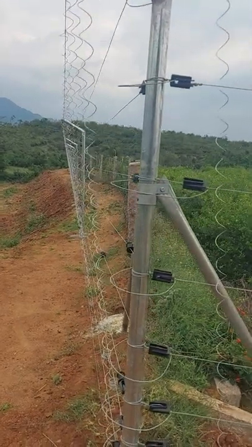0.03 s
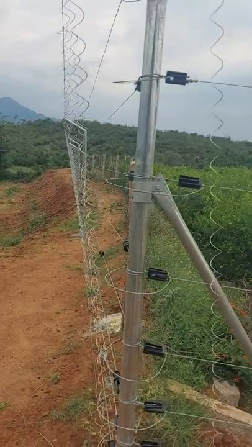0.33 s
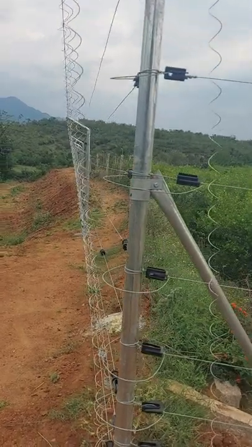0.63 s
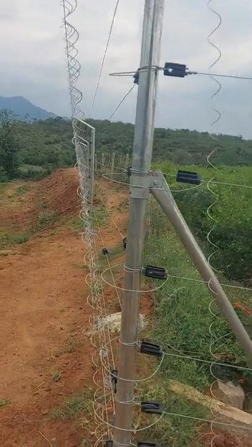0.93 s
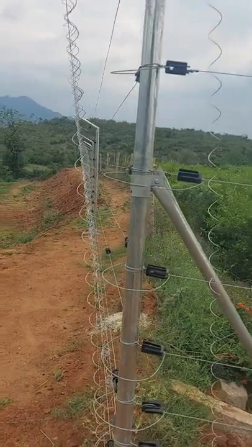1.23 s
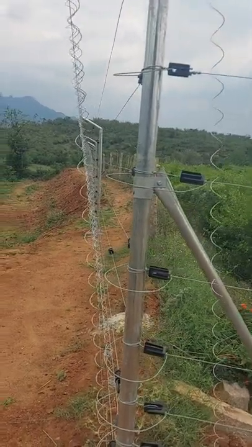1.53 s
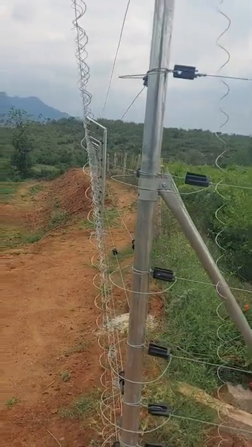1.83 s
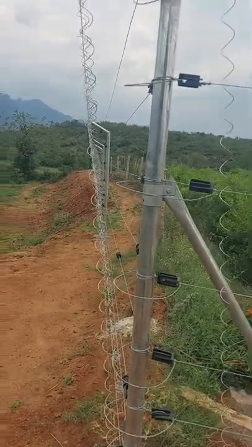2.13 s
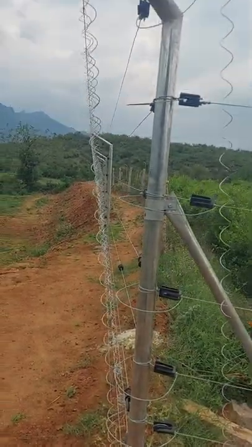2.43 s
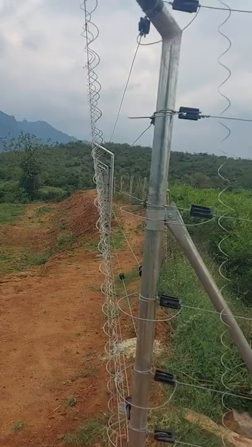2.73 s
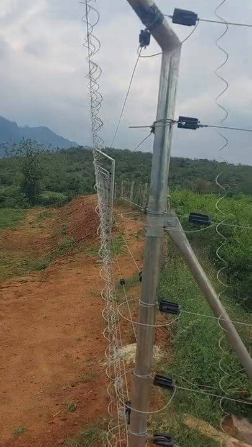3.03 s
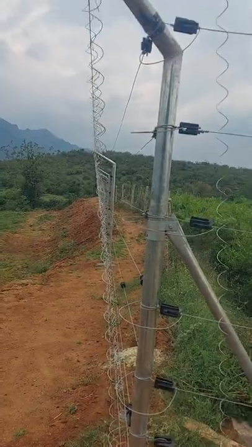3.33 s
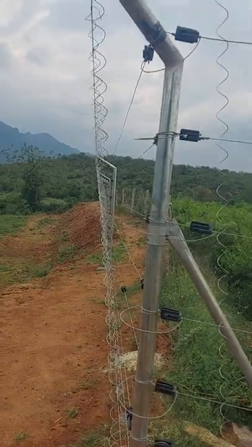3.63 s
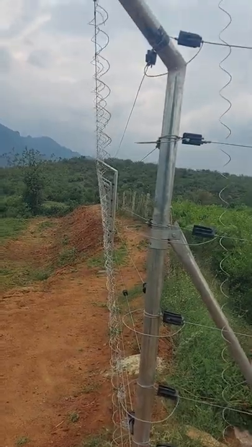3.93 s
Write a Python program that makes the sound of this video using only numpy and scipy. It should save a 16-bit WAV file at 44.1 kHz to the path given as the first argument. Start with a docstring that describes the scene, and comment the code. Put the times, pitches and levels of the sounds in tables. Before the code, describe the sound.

Metal fence wires scrape briefly, then from 0.5 seconds the fittings knock on a steel post in sharp, irregular ringing clinks, slightly to the right. They come in clusters until 1.2 seconds, from 1.7 to 2.2, and from 2.7 to 3.3, with small rustles and ticks between. A very faint bird whistles around 1 second. Low wind rumbles on the microphone, gusting around 3 seconds.

```python
"""Open country, where the wires and fittings of a metal fence knock on a steel post, a little to the right.
Each clink is a short chattering contact that sets the post, the fittings and a shimmer of wire modes
ringing; between clinks the wires slide and rustle, and a few dry ticks sound. Wind rumbles on the
microphone, mostly on the right, and a faint bird whistles far off in a soft wash of air."""
import sys
import numpy as np
from scipy import signal
from scipy.fft import rfft, irfft
from scipy.io import wavfile
from scipy.ndimage import uniform_filter1d

SR = 44100
rng = np.random.default_rng(int(sys.argv[2]) if len(sys.argv) > 2 else 0)


def wrap_up_sound(samples):
    """Save the sound to the file named by the first command line argument, as 16-bit audio."""
    columns = np.atleast_2d(samples).T
    # keep every value between -1 and 1, then stretch to whole-number steps
    tamed = np.clip(columns, -1, 1)
    steps = np.round(tamed * 32767).astype(np.int16)
    wavfile.write(sys.argv[1], SR, steps)


N = 176400

# ringing modes of the fittings: pitch_hz, level_db
FITTING_MODES = [(672, -7), (1383, -6), (1819, -4), (2505, 1), (2616, -3), (2897, -5), (3090, -21.5),
                 (3396, -11.5), (3660, -7.5), (3784, -7.5), (4326, -9), (4735, -3.5), (5105, -6),
                 (5498, -1.5), (5655, 2.5), (6420, -28.5), (6840, -16.5), (7455, -6), (9243, -15),
                 (9620, -5)]
RING_SAMPLES, CUTOFF_HZ, CHATTERS_PER_S = SR, 15800, 830


def from_db(db):
    """Decibels to gain."""
    return 10 ** (np.asarray(db) / 20)


def at_hz(points, hz):
    """Read a curve on a log-frequency axis."""
    knots_hz, values = np.transpose(points)
    return np.interp(np.log(np.maximum(hz, 1)), np.log(knots_hz), values)


def panned(db):
    """Left and right gains; positive dB leans left."""
    return from_db(np.array([[db], [-db]]) / 2)


def decay(t60_s):
    """An envelope that falls 60 dB in t60_s."""
    return from_db(-60 * np.arange(RING_SAMPLES) / SR / t60_s)


def add(out, start_s, sound):
    """Mix a sound in at its cue."""
    i = int(start_s * SR)
    out[:, i:i + sound.shape[-1]] += sound[..., :N - i]


def unit_rms(x):
    """Scale to unit rms."""
    return x / np.sqrt(np.mean(x ** 2) + 1e-20)


def noise(colour, size, correlation=0):
    """Coloured stereo noise that rolls off beyond the ends of its curve."""
    hz = np.arange(size // 2 + 1) * SR / size + 1
    skirts = np.minimum(1, hz / colour[0][0]) ** 2 * np.minimum(1, colour[-1][0] / hz) ** 4
    white = rfft(rng.standard_normal((2, size)))
    mid, side = irfft(white * from_db(at_hz(colour, hz)) * skirts, size)
    return unit_rms(np.sqrt(1 + correlation) * mid + np.sqrt(1 - correlation) * side * [[1], [-1]])


def levelled(rumble):
    """Smooth the slow chance swings out of a rumble."""
    return rumble / np.sqrt(uniform_filter1d(rumble ** 2, size=1600) + 0.092)


def wind():
    """Wind rumbles on the microphone: buffeting and brighter in gusts on the right, sheltered on the left."""
    # steady wind on each side: time_s, level_db
    right_levels = [(0, -35), (2.1, -34), (2.76, -29), (2.82, -18), (3.19, -19.5), (3.27, -49), (3.93, -45),
                    (4, -66)]
    left_levels = [(.3, -46.5), (.5, -29), (.7, -41), (1.75, -37), (2.35, -47.5), (3.12, -28.5),
                   (3.45, -49), (4, -57.5)]
    # short buffets on the right: peak_s, level_db
    buffets = [(0.242, -28), (0.544, -24.5), (0.881, -23.5), (1.356, -24.5), (1.591, -21.5), (1.92, -24),
               (2.078, -24), (2.149, -25), (2.394, -19), (2.691, -24), (2.892, -17), (3.635, -28)]
    # colour of light air and of a strong gust: frequency_hz, density_db
    breeze_colour = [(22, -41), (54, -2), (85, 0), (120, -8), (200, -20.5), (450, -45)]
    gust_colour = [(22, -56), (68, 1.5), (120, 4), (260, -12.5), (800, -47), (7000, -71.5)]
    # bass tilt of the sheltered side: frequency_hz, gain_db
    shelter_tilt = [(50, 13), (130, 6)]
    buffet_width_s, gust_from_db, gust_range_db = 0.024, -23.5, 7
    t = np.arange(N) / SR
    strength = from_db(np.interp(t, *np.transpose(right_levels)))
    for peak_s, db in buffets:
        buffet = from_db(db) * np.exp(-.5 * ((t - peak_s) / buffet_width_s) ** 2)
        strength = np.hypot(strength, buffet)
    gust_mix = np.clip((20 * np.log10(strength) - gust_from_db) / gust_range_db, 0, 1)
    breeze, gust = noise(breeze_colour, N)[0], noise(gust_colour, N)[0]
    right = strength * levelled(np.sqrt(1 - gust_mix) * breeze + np.sqrt(gust_mix) * gust)
    left_colour = [(hz, db + at_hz(shelter_tilt, hz)) for hz, db in breeze_colour]
    left = from_db(np.interp(t, *np.transpose(left_levels))) * levelled(noise(left_colour, N)[0])
    return np.array([left, right])


def country_air():
    """A wide, faint bed of distant air that slowly fades."""
    # colour of the air: frequency_hz, density_db
    air_colour = [(300, 2), (840, -7), (2360, -11), (3190, -21), (5600, -12.5), (9000, -22.5), (16000, -24)]
    start_db, fade_db_per_s = -62, 1
    return from_db(start_db - fade_db_per_s * np.arange(N) / SR) * noise(air_colour, N, correlation=0.19)


def wire_shimmer(count=480):
    """Closely packed modes of the wires, each reaching the two sides a little differently."""
    # strength of the wire modes: frequency_hz, level_db
    wire_colour = [(620, -2.5), (950, -13.5), (1850, -5.5), (3200, -10), (5500, -4.5), (8300, -6.5),
                   (13000, 2.5), (15800, -0.5)]
    # their ring time: frequency_hz, t60_s
    ring_times = [(4000, 0.28), (16000, 0.11)]
    t, out = np.arange(RING_SAMPLES) / SR, 0
    for hz in np.linspace(wire_colour[0][0], CUTOFF_HZ, count) + rng.uniform(-23.5, 20.1, count):
        phase = rng.uniform(0, 2 * np.pi) + rng.normal(0, 1.0, (2, 1))
        gain = from_db(at_hz(wire_colour, hz) + rng.normal(0, 4.45, (2, 1)))
        out += gain * np.sin(2 * np.pi * hz * t + phase) * decay(at_hz(ring_times, hz))
    return out / np.sqrt(count)


def metal_rings(modes, t60_s, slope=0):
    """One stereo ring per mode: a quick snap, then a tail of t60_s times (pitch / lowest pitch) ** slope."""
    # stereo placing of the modes: frequency_hz, left_over_right_db
    mode_pan = [(522, 2), (1300, -9), (2500, -1.5), (3100, 14.5), (5400, -6.5), (7300, 16.5), (9300, 9.5)]
    t, rings = np.arange(RING_SAMPLES) / SR, []
    snap = from_db(-1) * decay(t60_s=0.025)
    for k, (hz, db) in enumerate(modes):
        gain = (-1) ** k * from_db(db) * panned(at_hz(mode_pan, hz))
        tail = decay(t60_s * (hz / modes[0][0]) ** slope)
        rings.append(gain * (snap + tail) * np.sin(2 * np.pi * hz * t))
    return np.array(rings)


def struck(rings, boost_db=0, spread_db=2):
    """One blow gives each mode a strength of its own."""
    return np.tensordot(from_db(boost_db + rng.normal(0, spread_db, len(rings))), rings, 1)


def touches(per_s, envelope):
    """Tiny contacts of uneven size at random moments under an envelope; unit energy."""
    hits = rng.random(RING_SAMPLES) < per_s / SR
    return unit_rms(hits * rng.standard_normal(RING_SAMPLES) * envelope) / np.sqrt(RING_SAMPLES)


def driven(response, force):
    """What a body sounds like under a force scaled to unit energy."""
    return signal.fftconvolve(response, force[None] / np.linalg.norm(force), axes=1)[:, :RING_SAMPLES]


def contact_colour(sound, depth_db=6, step_hz=129.86, taps=8192):
    """The contact point gives the spectrum chance peaks and notches."""
    hz = np.linspace(0, SR / 2, taps // 2 + 1)
    ripple_db = depth_db * np.interp(hz / step_hz, np.arange(taps), rng.standard_normal(taps))
    cepstrum = irfft(np.log(from_db(ripple_db)))
    minimum_phase = irfft(np.exp(rfft(2 * cepstrum[:taps // 2], taps)))  # nothing rings before the hit
    return driven(sound, minimum_phase)


def shelved(sound, treble_db):
    """Raise or lower the treble."""
    highpass = signal.butter(1, 8000, "high", fs=SR, output="sos")
    return sound + (from_db(treble_db) - 1) * signal.sosfilt(highpass, sound)


def rustles(wires, fittings):
    """A wire slides over a fitting in a gritty run of tiny slips that starts at once and fades."""
    # wire slides: start_s, length_s, level_db
    slides = [(0.057, 0.051, -24.5), (0.286, 0.052, -6.5), (0.379, 0.047, -21), (0.709, 0.072, -7),
              (1.362, 0.013, -19), (1.628, .04, -16), (2.374, 0.027, -11), (3.727, 0.049, -18.5)]
    out, t = np.zeros((2, N)), np.arange(RING_SAMPLES) / SR
    for start_s, length_s, db in slides:
        slips = touches(CHATTERS_PER_S, np.sqrt(np.maximum(length_s - t, 0)))
        metal = contact_colour(wires) + struck(fittings)
        add(out, start_s, from_db(db) * shelved(driven(metal, slips), treble_db=-11))
    return out


def favoured_db(pitches_hz, boost_db=10, width_hz=90):
    """Modes of the fittings ring louder near the pitches that a contact point favours."""
    detuning = (np.array(FITTING_MODES)[:, :1] - pitches_hz) / width_hz
    return boost_db * np.exp(-detuning ** 2).max(axis=1)


def clinks(wires, fittings):
    """Each contact cracks, knocks and chatters briefly; post, fittings and wires ring on."""
    # hits on the post: start_s, level_db, post_db, treble_db, favoured_pitch_hz, other_favoured_pitch_hz
    hits = [(0.5106, 2, -7, -9, 3870, 9243), (.553, -7.5, -38, -4.5, 3784, 9243),
            (0.6724, -15, -2, -9, 4735, 4326), (.8834, -3.5, 3.5, -5, 672, 3090),
            (.91, -5.5, -6, -3, 4326, 6840), (1.145, -2.5, -8, -14, 3396, 3660),
            (1.2056, -5, -14.5, -9.5, 6840, 672), (1.6876, -3, -8, -8.5, 5498, 6420),
            (1.8457, -13, -1, -29, 4326, 3720), (2.0222, -4.5, 5, -0.5, 4735, 6840),
            (2.2273, -12.5, 2, 0.5, 3160, 2505), (2.7017, -3, -9, -10, 2897, 4735),
            (2.7427, -3.5, -26, -13, 7455, 3784), (2.992, -4, -0.5, -8, 7455, 5105),
            (3.045, -6.5, -3, -12, 5105, 1819), (3.0601, -5.5, 6, 3, 2670, 1383),
            (3.1509, -7.5, -3, -16, 2640, 3660), (3.172, -13.5, -27, -9, 2560, 7455),
            (3.3353, -11, -1.5, -7, 4735, 2616)]
    # ringing modes of the steel post: pitch_hz, level_db
    post_modes = [(522, -5), (1314, -4.5), (1994, -5.5), (2311, 6), (4172, -36), (5915, 9.5), (7044, -3.5),
                  (8414, -7)]
    # colour of the bright crack and of the dull knock: frequency_hz, density_db
    crack_colour = [(1100, -2), (2300, -1.5), (6000, 7), (9000, 0.5), (16000, 5)]
    knock_colour = [(450, -23), (650, 11.5), (900, -9.5), (1400, -4.5), (1850, 13), (2300, -6.5)]
    clash_s, attack_s, softness = 0.0074, 0.0013, 0.49
    out, t = np.zeros((2, N)), np.arange(RING_SAMPLES) / SR
    post = metal_rings(post_modes, t60_s=0.72, slope=-0.53)
    for start_s, db, post_db, treble_db, *pitches_hz in hits:
        chatter = touches(CHATTERS_PER_S, decay(t60_s=0.062))
        rebounds = from_db(-4.5) * touches(per_s=90, envelope=decay(t60_s=0.24))  # loose parts rattle
        force = chatter + rebounds
        force[0] = from_db(-4)  # the first touch
        crack = from_db(-20.5) * noise(crack_colour, RING_SAMPLES, correlation=0.067) * decay(t60_s=.025)
        clink = contact_colour(driven(wires + crack, force))
        knock = noise(knock_colour, RING_SAMPLES, correlation=0.64) * decay(t60_s=0.048)
        clink += from_db(post_db - 30.5) * panned(-5) * knock
        clink *= 1 + from_db(2.5 + db) * np.exp(-(t / clash_s) ** 2)  # hard hits get extra punch
        clink += from_db(post_db - 39) * struck(post) + struck(fittings, favoured_db(pitches_hz))
        attack = 1 - np.exp(-t / attack_s * from_db(softness * db))  # weak hits slide in more slowly
        add(out, start_s, from_db(db) * attack * shelved(clink, treble_db))
    return out


def bird():
    """Thin distant whistles that swell and fade along an arc of pitch."""
    # whistles: start_s, length_s, start_hz, middle_hz, end_hz, level_db
    whistles = [(0.768, 0.093, 6700, 5560, 3900, -54.5), (1.015, 0.039, 4770, 6640, 3570, -55.5),
                (1.086, 0.048, 2580, 4480, 4670, -51), (1.24, 0.054, 3900, 4690, 4360, -57.5),
                (1.28, 0.058, 3400, 3120, 2540, -60)]
    out = np.zeros((2, N))
    for start_s, length_s, *arc_hz, db in whistles:
        progress = np.linspace(0, 1, int(length_s * SR))
        pitch_hz = np.polyval(np.polyfit([0, .5, 1], arc_hz, 2), progress)
        swell = from_db(db) * np.sin(np.pi * progress)
        add(out, start_s, swell * np.sin(2 * np.pi * np.cumsum(pitch_hz) / SR))
    return out


def foliage_scatter(sound, wet=0.7):
    """Foliage blurs a distant sound with a short diffuse tail."""
    tail = rng.standard_normal((2, RING_SAMPLES)) * decay(t60_s=0.26)
    return sound + wet * signal.fftconvolve(sound, tail / np.linalg.norm(tail[0]), axes=1)[:, :N]


def ticks():
    """Small dry taps that do not ring."""
    # taps: start_s, level_db, upper_edge_hz
    taps = [(2.276, -37.5, 1560), (2.284, -34, 1590), (2.827, -28, 1780)]
    out = np.zeros((2, N))
    for start_s, db, edge_hz in taps:
        band = signal.butter(2, [550, edge_hz], "band", fs=SR, output="sos")
        burst = rng.standard_normal(RING_SAMPLES) * decay(t60_s=0.015)
        add(out, start_s, from_db(db) * np.sqrt(SR / 2 / edge_hz) * signal.sosfilt(band, burst))
    return out


def scene():
    """The fence reaches the left side slightly late; wind, bird and air surround it."""
    wires = from_db(-26) * wire_shimmer()
    fittings = from_db(-39.5) * metal_rings(FITTING_MODES, t60_s=0.16)
    left, right = clinks(wires, fittings) + rustles(wires, fittings) + ticks()
    left_lag_s = .00025
    fence = np.array([np.pad(left, (round(left_lag_s * SR), 0))[:N], right])
    return fence + wind() + foliage_scatter(bird()) + country_air()


def record(dry):
    """A steep low-pass cuts the very top."""
    return signal.sosfilt(signal.ellip(10, .2, 80, CUTOFF_HZ, fs=SR, output="sos"), dry)


dry = scene()
out = record(dry)
wrap_up_sound(out)
```